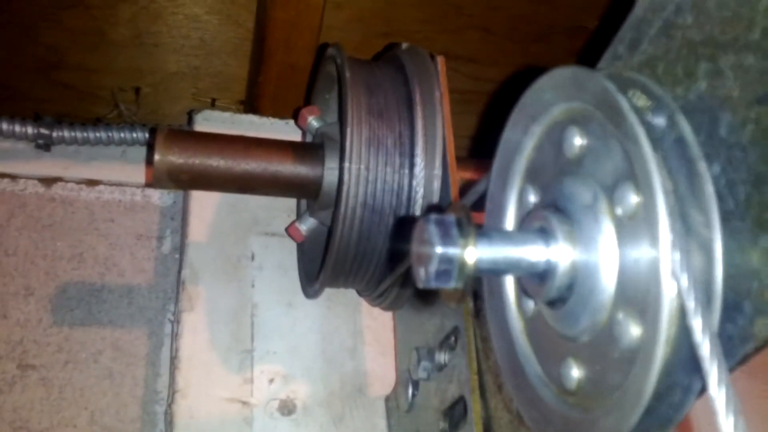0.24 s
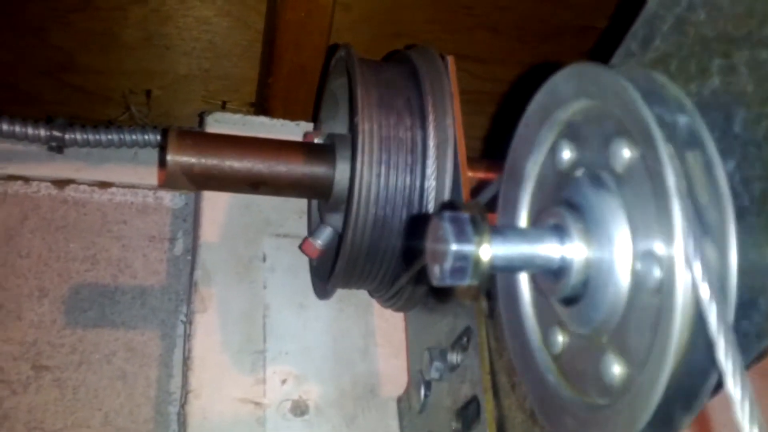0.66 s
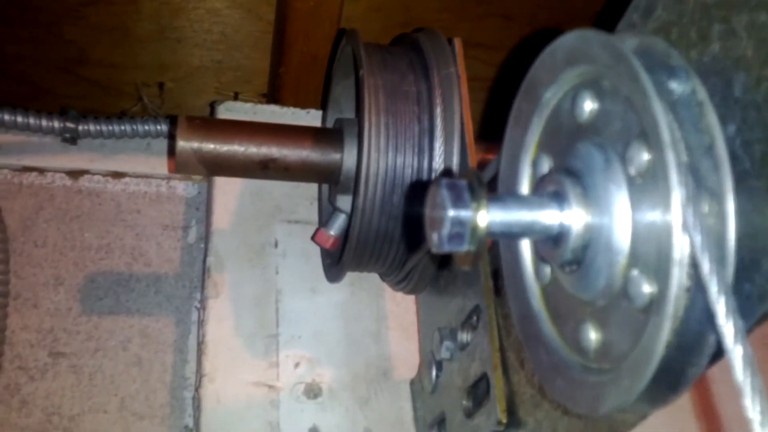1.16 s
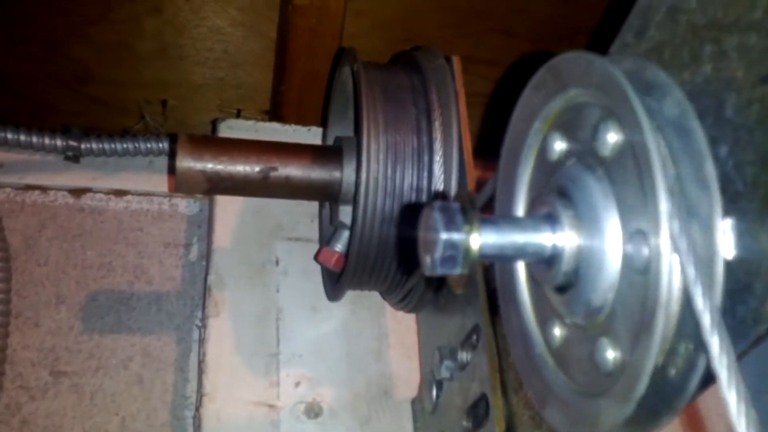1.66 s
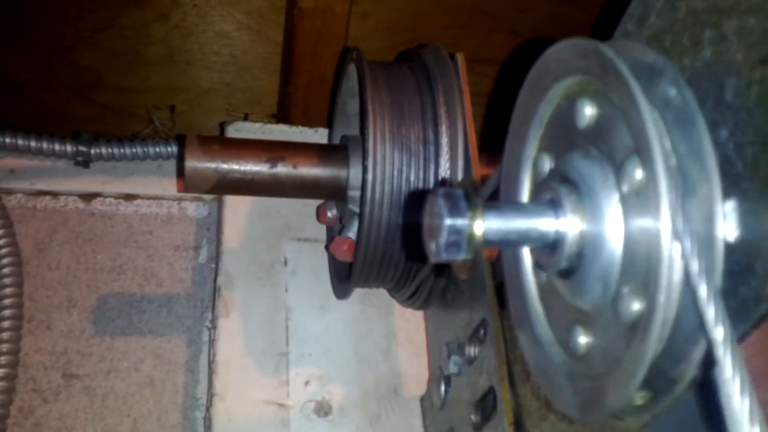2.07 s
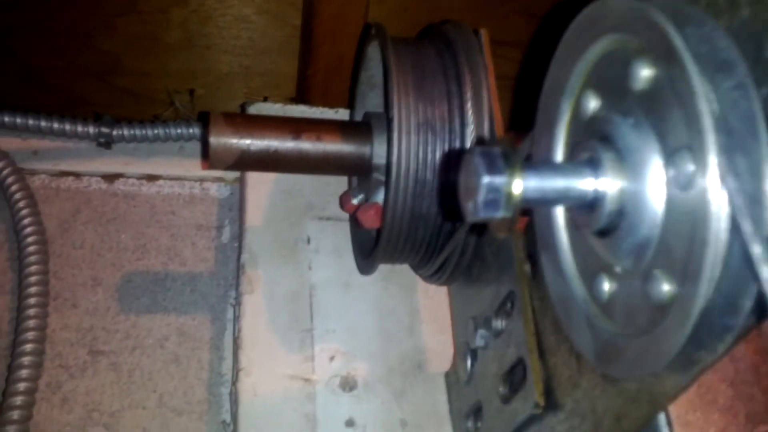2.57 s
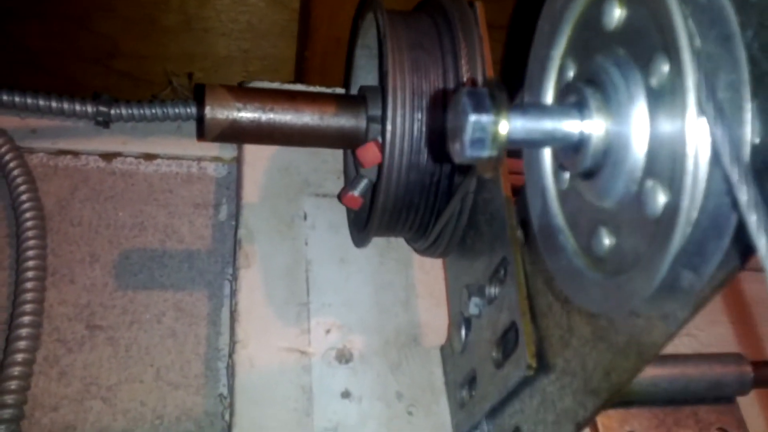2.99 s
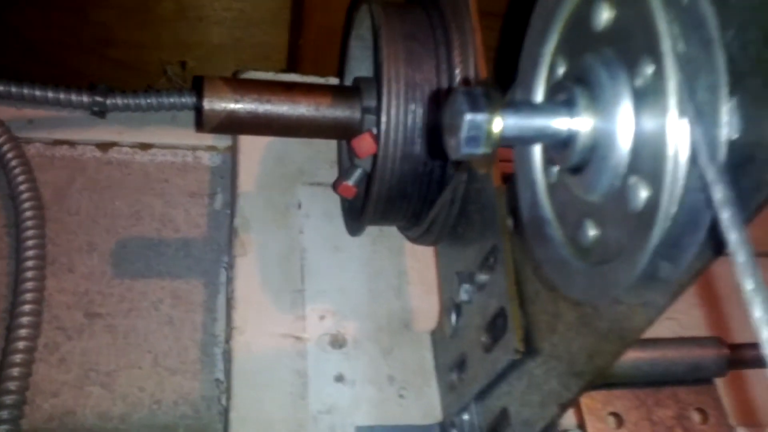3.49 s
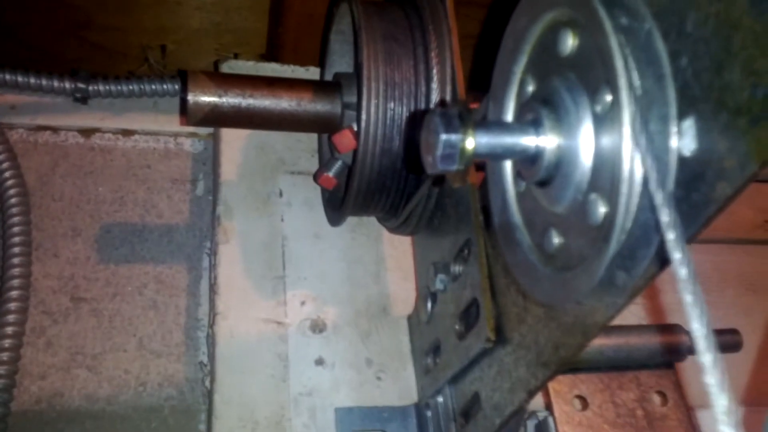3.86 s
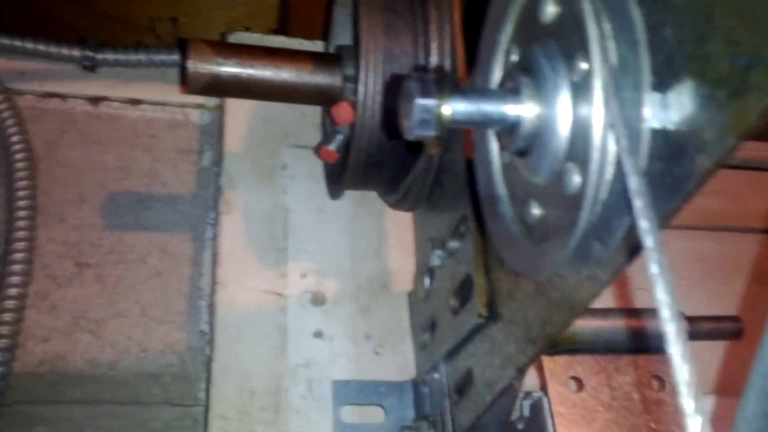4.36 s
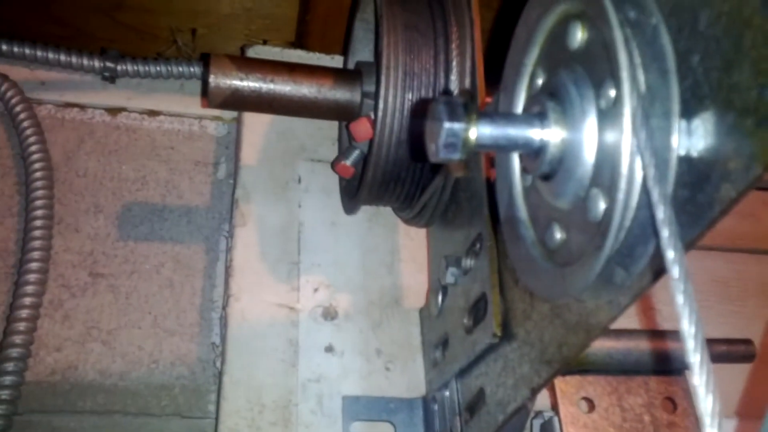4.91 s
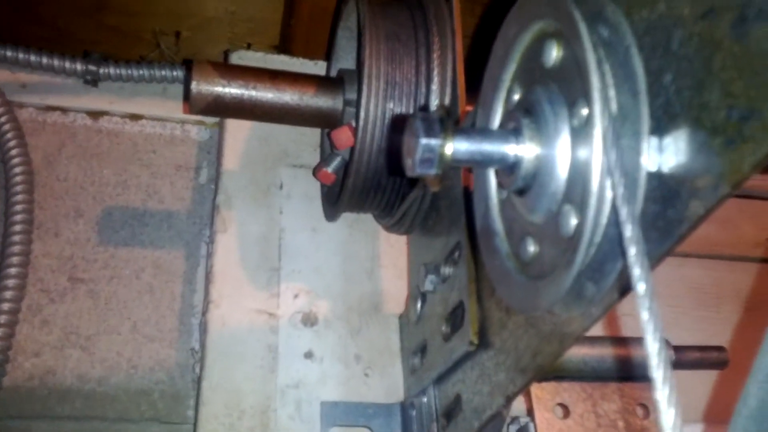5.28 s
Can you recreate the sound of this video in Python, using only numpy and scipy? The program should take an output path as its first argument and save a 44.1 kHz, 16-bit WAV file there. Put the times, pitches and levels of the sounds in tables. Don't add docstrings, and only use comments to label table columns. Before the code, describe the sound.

Sharp dry cable ticks over faint rolling, then a garage door jolts to a stop with loud metallic clanks, a bright twang and a quick fade.

```python
import sys
import numpy as np
from scipy import signal
from scipy.fft import rfft, irfft, next_fast_len
from scipy.io import wavfile
from scipy.ndimage import uniform_filter1d

SR = 44100
rng = np.random.default_rng(int(sys.argv[2]) if len(sys.argv) > 2 else 0)


def unload_wav(signal):
    wavfile.write(
        sys.argv[1],
        SR,
        np.round(np.clip(np.atleast_2d(signal).T, -1, 1) * 32767).astype(np.int16),
    )


def ratio(d):
    e = np.asarray(d, float) / 20
    return 10 ** e


N = 244314

# (frequency [Hz], level [dB per Hz])
PANEL_NOISE = [(150, -47), (250, -23), (457, -18), (560, -6), (976, -5.5), (1240, -3.5), (1420, -5),
               (1880, -9.5), (3000, -24), (3900, -54), (6600, -120)]


def evened(x):
    return x / np.sqrt(np.mean(x ** 2) + 1e-20)


def read(points, hz):
    f, value = np.transpose(points)
    return np.interp(np.log(hz + 1), np.log(f + 1), value)


def add(mix, s, sound):
    part = mix[round(s * SR):][:len(sound)]
    part += sound[:len(part)]


def inside(spectrum, hz):
    return (hz >= spectrum[0][0]) & (hz <= spectrum[-1][0])


def coloured(x, spectrum, tilt_db=0., pitch=0.99):
    size = next_fast_len(len(x), True)
    hz = np.fft.rfftfreq(size, 1 / SR) / pitch
    gain = inside(spectrum, hz) * ratio(read(spectrum, hz) + tilt_db * np.log2(hz / 7000 + 1e-3))
    return evened(irfft(rfft(x, size) * gain, size)[:len(x)])


def wash(spectrum, level_db, patchy_db, flicker_db):
    frames, hz = N // 256 + 5, np.fft.rfftfreq(1024, 1 / SR)
    a, b, patches = rng.standard_normal((frames, 513, 3)).T
    patches = uniform_filter1d(patches, size=12, axis=0)
    patches = evened(uniform_filter1d(patches, size=12, axis=1))
    flicker = evened(uniform_filter1d(rng.standard_normal(frames), size=4))
    gain = inside(spectrum, hz) * ratio(read(spectrum, hz))
    z = (a + 1j * b) * gain[:, None] * ratio(patchy_db * patches + flicker_db * flicker)
    return ratio(level_db) * evened(signal.istft(z, nperseg=1024, noverlap=768)[1][:N])


def motion():
    # (frequency [Hz], level [dB per Hz])
    shudder = [(7.1, -33), (12, -3), (32, 6), (110, -6.5), (140, -31), (240, -120)]
    rumble = [(53, -33), (90, -4), (155, 0.5), (210, -8.5), (259, -8.5), (450, -17), (580, -38),
              (990, -120)]
    rolling = [(150, -29.5), (250, 0), (439, -1.5), (605, 2.5), (1040, 2), (1300, -1.5), (1480, -1),
               (2020, -9.5), (3500, -20.5), (4550, -51), (7700, -120)]
    hiss = [(1180, -28), (2000, -5), (3480, -5), (5140, -4), (5600, -4), (6110, -3), (7260, -5), (11700, 1),
            (15200, -9.5), (15800, -8)]
    # (time [s], level [dB])
    creep = [(0, -60), (.32, -57), (.55, -56), (.76, -52), (.95, -59), (1.19, -58.5), (1.5, -56),
             (1.94, -52), (2.2, -53), (2.4, -59), (3.2, -61.5), (3.42, -71), (3.6, -62.5), (3.85, -66.5),
             (4.5, -68), (5.54, -71)]
    # (time [s], wall [dB], frame [dB], wheels [dB])
    lurches = [(2.1, -48, -39, -60.5), (2.348, -34, -29, -39), (2.6, -37, -37, -39),
               (2.694, -22.5, -20.5, -33), (2.79, -27, -29.5, -39), (2.889, -20.5, -20.5, -34),
               (2.97, -23.5, -22.5, -29), (3.089, -25, -36, -47.5), (3.27, -32, -40.5, -64.5),
               (3.55, -42, -52.5, -69), (3.76, -47, -63, -74), (4.03, -48.5, -63, -75)]
    # (wall, frame, wheels, hiss) [dB], [ratio]
    rest_levels_db = [-58.5, -61, -70, -66]
    creep_shares = [.2, .3, 1, .6]
    # (wall, frame, wheels) [s]
    lurch_rise_s = [0.042, 0.043, .06]
    lurch_t60_s = [.9, 0.82, .6]

    t = np.arange(0, N + 64, 64) / SR
    creep_db = np.interp(t, *np.transpose(creep)) + 70
    power = ratio(np.array(rest_levels_db)[:, None] + np.outer(creep_shares, creep_db)) ** 2
    rise, t60 = np.array([lurch_rise_s, lurch_t60_s])[:, :, None]
    for s, *db in lurches:
        since = np.maximum(t - s, 0)
        fall = ratio(np.array(db)[:, None] - 60 * since / t60)
        power[:-1] += (fall * (1 - np.exp(-(since / rise) ** 2))) ** 2
    levels_db = [np.interp(np.arange(N) / SR, t, 10 * np.log10(p)) for p in power]
    wall_db, frame_db, rolling_db, hiss_db = levels_db
    out = wash(shudder, wall_db, patchy_db=.3, flicker_db=.2)
    out += wash(rumble, frame_db, patchy_db=.6, flicker_db=.6)
    out += wash(rolling, rolling_db, patchy_db=-0.5, flicker_db=0.9)
    return out + wash(hiss, hiss_db, patchy_db=1.2, flicker_db=1.2)


def microphone_hiss():
    # (frequency [Hz], level [dB per Hz])
    own_hiss = [(4120, -40), (7000, -10.5), (10100, -10), (10700, -4.5), (11900, -1), (15800, -10.5)]
    return wash(own_hiss, level_db=-68, patchy_db=1.0, flicker_db=-0.9)


def bearing_whine():
    hz, width_hz, db, fade_db_per_s = 5800, 150, -72, 6.0
    narrow = [(hz - 2 * width_hz, -30), (hz, 0), (hz + 2 * width_hz, -30)]
    fall = ratio(db - fade_db_per_s * np.arange(N) / SR)
    return fall * coloured(rng.standard_normal(N), narrow, pitch=0.99)


def bumps():
    # (time at the peak [s], level [dB])
    flat_spots = [(0.066, -44), (0.426, -46), (0.851, -52), (0.999, -56), (1.16, -52), (1.301, -54),
                  (1.369, -48), (1.52, -52), (1.829, -52), (1.875, -50), (2.07, -50)]
    note_hz, half_s, lead_s = 156.6, 0.019, .1
    out, t = np.zeros(N), np.arange(SR // 5) / SR - lead_s
    swell = np.sin(2 * np.pi * note_hz * t) * np.exp(-(t / half_s) ** 2)
    for s, db in flat_spots:
        skip = round(max(lead_s - s, 0) * SR)
        add(out, max(s - lead_s, 0), ratio(db) * swell[skip:])
    return out


def pings():
    # (time [s], frequency [Hz], spread [Hz], level [dB], t60 [s]) # faint pips of grit under the cable,
    # then low ticks and a hum as the door settles
    pips = [
        (.2465, 5600, 700, -44, .015),
        (.443, 10700, 1800, -43, .015),
        (.586, 7000, 700, -45, .012),
        (2.185, 13000, 3480, -44, .02),
        (2.273, 11500, 900, -50, .015),
        (3.575, 850, 600, -57, .15),
        (3.625, 598, 90, -50.5, .4),
        (3.69, 1250, 500, -51, .3),
    ]
    loose_parts = [(2.094, 1600, 699, -34.5, 0.52), (2.097, 5250, 500, -37, 0.25),
                   (2.097, 6930, 500, -42, 0.22), (2.3615, 5050, 600, -4, 0.037),
                   (2.3611, 11400, 1600, -4.5, 0.051), (2.361, 11450, 756, -25.5, 0.095),
                   (2.3615, 680, 300, -29, 0.7), (2.696, 8750, 1500, -13, 0.3),
                   (2.695, 15000, 2600, -21.5, 0.2), (2.8899, 5270, 774, -22.5, 0.17),
                   (2.941, 9200, 1296, -20, 0.11), (2.964, 6100, 980, -17.5, 0.18),
                   (2.964, 1225, 400, -11.5, 0.085), (3.1225, 3500, 900, -16, .025),
                   (3.123, 9060, 400, -38.5, .04), (2.364, 1420, 260, -17, .45),
                   (2.985, 3600, 300, -21, 0.45), (2.3615, 6300, 600, -16, 0.066),
                   (2.366, 980, 350, -24, .7), (2.946, 2050, 400, -21.5, .15), (2.968, 2000, 200, -21, .1),
                   (2.696, 9950, 700, -18.5, .25), (3.0985, 5700, 3800, -21, .05)]
    booms = [
        (2.6, 649, 401.7, -41, 0.53),
        (2.7, 248, 50, -22.5, 0.23),
        (2.967, 428, 120.7, -21, 0.22),
        (2.968, 262, 49.9, -22, .2),
        (3.099, 1432, 600, -22.5, 0.098),
        (3.126, 931, 197, -25, 0.45),
        (2.95, 540, 160, -27, .35),
    ]
    out, t = np.zeros(N), np.arange(SR // 3) / SR
    edges = np.minimum(np.minimum(t / 0.0012, (t[-1] - t) / .12), 1)
    for s, hz, spread_hz, db, t60 in loose_parts + booms + pips:
        place, phase = rng.random((2, 32, 1))
        off = (np.arange(32)[:, None] + place) / 16 - 1
        fall_db = 60 * t * (1 + 1.6 * off ** 2) / t60
        partials = np.sin(2 * np.pi * ((hz + .55 * spread_hz * off) * t + phase))
        bundle = (ratio(-fall_db) * partials).sum(0) / 4
        add(out, s, ratio(db) * bundle * edges)
    return out


def cable():
    # (time [s], peak [dB], tilt [dB per octave], ring
    ticks = [(.2685, -9, 5.5, 1.2), (0.8115, -9.5, 4, 1.2), (0.868, -43, 6.5, .9), (0.8698, -28, 9, 0.6),
             (1.633, -50, 7.5, 1.4), (1.699, -8.5, 4, 0.96), (2.346, -34, 2.5, 0.51),
             (2.3557, -28.5, 4.5, 0.39), (2.3618, -2.5, 4.5, 0.92), (2.5915, -11, 3.5, 0.98),
             (2.695, -20.5, 6.5, 2.8), (2.89, -9.5, 2.5, 1.1), (2.964, -8.5, 3.5, 2.5),
             (3.0987, -20.5, 0.3, 1.9), (3.121, -22, -5.5, 0.97)]
    # (frequency [Hz], level [dB per Hz])
    drum_noise = [(470, -50), (800, -29.5), (1160, -19.5), (1940, -27), (2400, -14.5), (2690, -19.5),
                  (3410, -14), (4950, -16.5), (6860, -3), (8900, -10), (10700, 0), (15200, -23),
                  (15800, -25.5)]
    # (frequency [Hz], level [dB], t60 [s])
    drum = [(1180, -20.5, 0.041), (2470, -11.5, .04), (2914, -16, .04), (3404, -8.5, .04), (3790, -14, .03),
            (4530, -12, .03), (5780, -2, 0.02), (6000, 0, 0.022), (6650, 2, 0.018), (6970, -6, 0.025),
            (7940, -5.5, .02), (8500, -6, 0.07), (10400, -0.5, 0.014), (10900, -2.5, 0.012),
            (11800, -7, 0.014), (14400, -8.5, .012)]
    fresh = .35
    out, t = np.zeros(N), np.arange(SR // 8) / SR
    hz, mode_db, t60 = np.array(drum).T[:, :, None]
    fall = ratio(mode_db - 60 * t / np.minimum(t60, .035))
    shiver = (fall * np.sin(2 * np.pi * (hz * t + rng.random(hz.shape)))).sum(0)
    same = rng.standard_normal(len(t))
    for s, db, tilt_db, stretch in ticks:
        grain = (1 - fresh) * same + fresh * rng.standard_normal(len(t))
        snap = coloured(grain, drum_noise, tilt_db) * ratio(-60 * t / (.009 * stretch))
        scatter = coloured(rng.standard_normal(len(t)), drum_noise, tilt_db - 11)
        snap += scatter * ratio(-19.5 - 60 * t / (.1 * stretch))
        tick = snap + ratio(-7.0 - 1.5 * abs(tilt_db)) * shiver
        add(out, s, ratio(db) * tick * (1 - np.exp(-(t / .0003) ** 2)))
    return out


def garage(x):
    # (frequency [Hz], t60 [s])
    decay = [(300, .5), (1200, .42), (3500, .24), (7000, .2), (12000, .19)]
    taps = np.zeros(SR // 2)
    at = np.arange(150, SR // 2 - 20, 20)
    taps[at + rng.integers(0, 20, len(at))] = rng.choice([-1., 1.], len(at))
    hz, t, z = signal.stft(taps, SR, nperseg=256)
    t60 = np.clip(read(decay, hz), .05, 2)[:, None]
    tail = signal.istft(z * ratio(-60 * t / t60), SR, nperseg=256)[1]
    return signal.fftconvolve(x, tail / np.linalg.norm(tail))[:N]


def shell(x):
    hz, spread_hz, db, t60 = 575, 170, -14.0, .6
    t = np.arange(SR) / SR
    detune, phase = rng.random((2, 24, 1))
    off = (np.arange(24)[:, None] + detune) / 24 - .5
    modes = np.sin(2 * np.pi * ((hz + spread_hz * off) * t + phase))
    hum = modes.sum(0) * ratio(-60 * t / t60)
    return ratio(db) * signal.fftconvolve(x, hum / abs(rfft(hum)).max())[:N]


def scuffs():
    # (time at the peak [s], low [dB], high [dB], swell [s], fade [s])
    brushes = [
        (.70, -57, -57, 0.11, 0.033),
        (3.667, -53, -48, 0.039, 0.054),
        (3.972, -60.5, -54, 0.025, 0.088),
    ]
    # (frequency [Hz], level [dB per Hz])
    rub = [(1200, -27), (2000, -4), (3200, -.5), (4800, -1), (6500, -4.5), (9000, 0.5), (11700, 1.5),
           (15800, -9)]
    out, t = np.zeros(N), np.arange(N) / SR
    low, high = (coloured(rng.standard_normal(N), c) for c in (PANEL_NOISE, rub))
    grain = ratio(1.5 * evened(uniform_filter1d(rng.standard_normal(N), size=150)))
    low, high = evened(low * grain), evened(high * grain)
    for s, low_db, high_db, swell, fade in brushes:
        length, power = np.where(t < s, swell, fade), np.where(t < s, 2, 1.3)
        out += (ratio(low_db) * low + ratio(high_db) * high) * np.exp(-abs((t - s) / length) ** power)
    return out


def ring(modes, spectrum, t60, rise, share, split_hz, stretch=1., pitch=1.):
    hz, db, mode_t60 = np.array(modes).T[:, :, None]
    t = np.arange(SR // 2 if mode_t60.max() > .22 else SR // 3) / SR
    fall = ratio(db - 60 * t / (mode_t60 * stretch))
    lines = 0
    for detune, phase in rng.random((4, 2, len(modes), 1)):
        partial_hz = hz * pitch + split_hz * (detune - .5)
        lines = lines + (fall * np.sin(2 * np.pi * (partial_hz * t + phase))).sum(0)
    lines = lines / np.sqrt(2 * (ratio(db) ** 2).sum())
    crowd = coloured(rng.standard_normal(len(t)), spectrum, pitch=pitch) * ratio(-60 * t / (t60 * stretch))
    share = np.clip(share, 0, 1)
    return (share * lines + (1 - share) * crowd) * (1 - np.exp(-(t / rise) ** 2))


def door():
    # (time [s], panel [dB], rail [dB], bracket [dB], ring length [factor])
    jolts = [(2.094, -42.5, -52, -47, 1.7), (2.149, -30, -49, -59, 1.48), (2.3449, -20, -40, -47.5, 0.28),
             (2.3615, -14.5, -17.5, -23, 1.36), (2.619, -35.5, -46, -52.5, 6.4),
             (2.695, -19, -24.5, -16, 1.76), (2.8895, -19, -23.5, -32, 1.6),
             (2.910, -25.5, -34.5, -16.5, 1.3), (2.942, -19, -22.5, -14.5, 1.8),
             (2.964, -14, -12.5, -3, 1.75), (3.098, -23, -31, -24.5, 0.69), (3.123, -19, -29, -46, 0.7),
             (3.942, -61, -59, -52, 1.55)]
    # (time [s], pitch [factor])
    rail_load = [
        (2.4, 0.96),
        (2.7, 1.1),
        (2.9, 1.2),
        (2.96, 0.85),
    ]
    # (frequency [Hz], level [dB], t60 [s])
    panel = [(668, -9, .33), (883, -3, .33), (958, -7, .35), (1180, -10, .25), (1416, -.5, .3),
             (1680, -11, .3)]
    rail = [(3386, -11, .18), (4430, -9, .15), (4797, -.5, .14), (5006, -6, .2), (5792, -9, .15),
            (6401, -8, .17)]
    bracket = [(9900, -9, .14), (10700, -1, .17), (10950, -.5, .18), (11150, -2, .18), (11600, -6, .16),
               (13400, -8, .12)]
    # (frequency [Hz], level [dB per Hz])
    rail_noise = [(1290, -34), (2200, -4.5), (3660, -4), (4030, -9), (4970, -1.5), (5500, -6.5),
                  (6630, -8.5), (7720, -19), (8500, -15), (11000, -46), (18700, -120)]
    bracket_noise = [(4410, -41.5), (7500, -11), (8550, -13), (9910, -6.5), (10300, 0), (11100, 3.5),
                     (12400, -7), (13500, -5.5), (15800, -25)]
    out = np.zeros(N)
    for s, panel_db, rail_db, bracket_db, stretch in jolts:
        pitch = np.interp(s, *np.transpose(rail_load))
        add(out, s, ratio(panel_db) * ring(panel, PANEL_NOISE, t60=0.33, rise=0.0029, share=0.3,
                                         split_hz=120.0, stretch=stretch))
        add(out, s, ratio(rail_db) * ring(rail, rail_noise, t60=0.24, rise=0.00051, share=0.27,
                                        split_hz=190.0, stretch=stretch, pitch=pitch))
        add(out, s, ratio(bracket_db) * ring(bracket, bracket_noise, t60=0.14, rise=0.0022, share=0.18,
                                           split_hz=350.0, stretch=stretch))
    return out


def spring():
    # (frequency [Hz], level [dB], t60 [s])
    coil = [(8030, -14, .2), (8258, -13, .28), (8597, -11, .2), (8320, -5, .26), (8393, -.5, .25),
            (8464, 1, .24), (8540, -8, .25), (8702, -13, .22), (8790, -11, .25), (8890, -9, .15),
            (9023, -11, .17), (9378, -12, .17)]
    # (frequency [Hz], level [dB per Hz])
    coil_noise = [(2940, -67), (5000, -27), (6490, -28.5), (6710, -24), (7280, -16), (7980, -10.5),
                  (8300, 0.5), (8580, -3), (8880, -7), (10800, -23.5), (13200, -36.5), (14900, -25.5),
                  (15800, -26)]
    out, s, db = np.zeros(N), 2.6965, -0.34
    twang = ring(coil, coil_noise, t60=0.22, rise=0.0046, share=.66, split_hz=13., stretch=1.25)
    add(out, s, ratio(db) * twang)
    return out


def rattle():
    # (start [s], length [s], level [dB])
    rattles = [
        (2.9, .06, -26),
        (2.968, .13, -14),
        (3.1, .06, -28),
    ]
    # (frequency [Hz], level [dB per Hz])
    knock_noise = [(500, -20), (1000, -3), (1500, -.5), (2200, -6), (3600, -3), (5000, -6), (6300, -4.5),
                   (8000, -20)]
    knocks_per_s, knock_t60_s, fade_db = 160, .014, -14
    out, t = np.zeros(N), np.arange(SR // 40) / SR
    for start, length, db in rattles:
        for place, size, pitch in rng.random((round(knocks_per_s * length), 3)):
            knock = coloured(rng.standard_normal(len(t)), knock_noise, pitch=.8 + .4 * pitch)
            fall = ratio(db + fade_db * place - 12 * size - 60 * t / knock_t60_s)
            add(out, start + place * length, knock * fall)
    return out


def thuds():
    # (time [s], level [dB], frequency [Hz], t60 [s])
    knocks = [
        (3.62, -50.5, 574, 0.39),
        (3.941, -46, 217, 0.075),
    ]
    out, t = np.zeros(N), np.arange(SR // 4) / SR
    for s, db, hz, t60 in knocks:
        dull = [(hz * 0.24, -20), (hz * 0.595, -3), (hz, -.1), (hz * 1.9, -6), (hz * 3.4, -22)]
        knock = coloured(rng.standard_normal(len(t)), dull) * np.minimum(t / 0.0033, 1)
        add(out, s, ratio(db - 60 * t / t60) * knock)
    return out


def squeak():
    s, hz, db, half_s = 4.33, 1830, -72.5, .2
    narrow = [(hz * .75, -30), (hz * .92, -9), (hz, -.1), (hz * 1.1, -8), (hz * 1.5, -30)]
    swell = np.exp(-((np.arange(N) / SR - s) / half_s) ** 2)
    return ratio(db) * coloured(rng.standard_normal(N), narrow) * swell


def scene():
    ticks = cable()
    jolts = door() + spring() + thuds() + pings() + rattle()
    slap = ratio(-22.0) * np.roll(ticks, round(0.0069 * SR))
    echoes = garage(ratio(-19) * ticks + ratio(-13.5) * jolts)
    hum = shell(ratio(24.0) * ticks + ratio(17.5) * jolts)
    soft = motion() + bumps() + bearing_whine() + scuffs() + squeak()
    return (soft + ticks + slap + jolts + echoes + hum)[None]


def low_pass(x):
    return signal.sosfilt(signal.butter(12, 15980, fs=SR, output="sos"), x)


def record(dry):
    mix = np.clip(dry + microphone_hiss(), -.97, .97)
    return low_pass(mix)


dry = scene()
out = record(dry)
unload_wav(out)
```